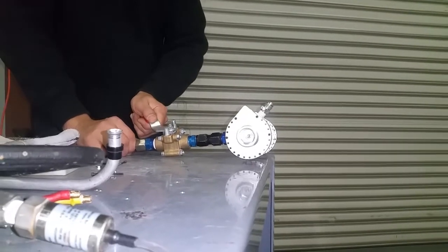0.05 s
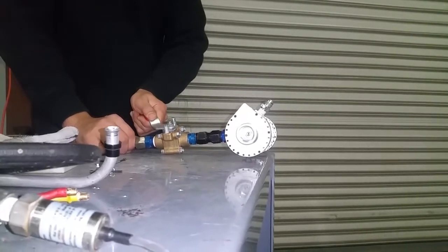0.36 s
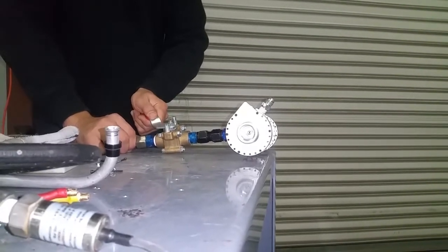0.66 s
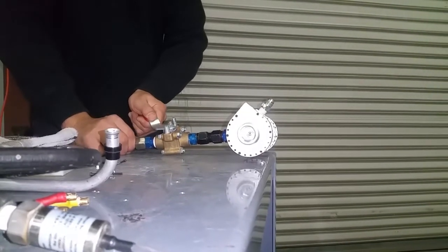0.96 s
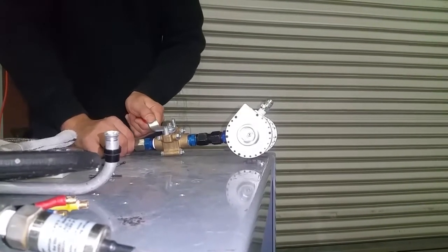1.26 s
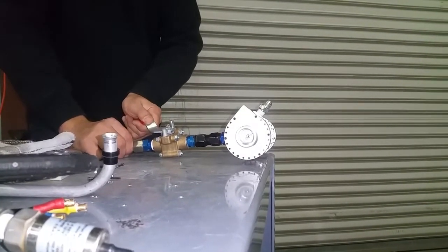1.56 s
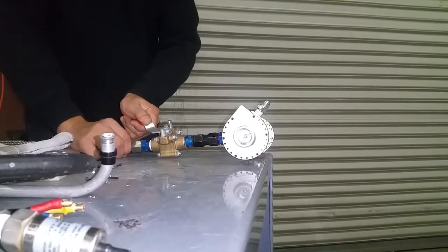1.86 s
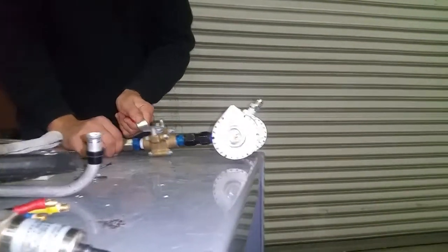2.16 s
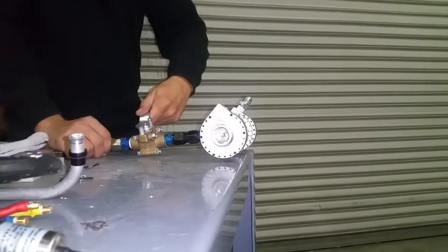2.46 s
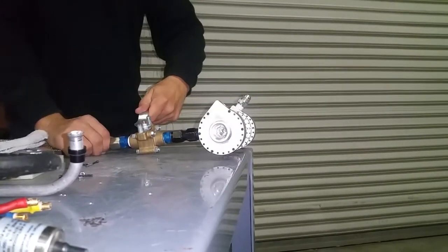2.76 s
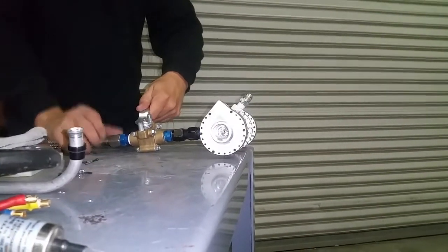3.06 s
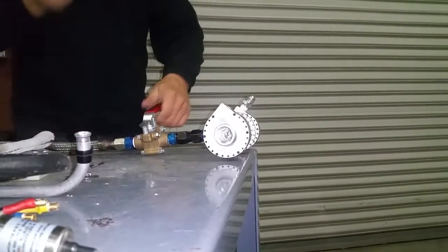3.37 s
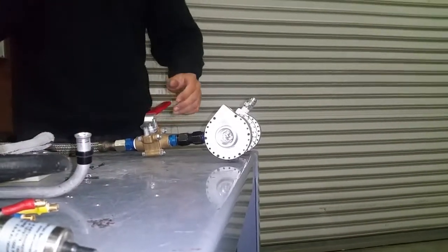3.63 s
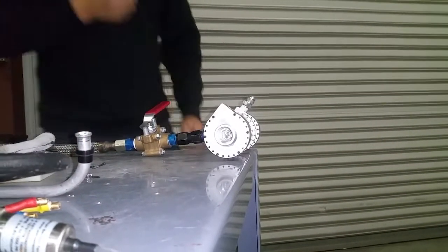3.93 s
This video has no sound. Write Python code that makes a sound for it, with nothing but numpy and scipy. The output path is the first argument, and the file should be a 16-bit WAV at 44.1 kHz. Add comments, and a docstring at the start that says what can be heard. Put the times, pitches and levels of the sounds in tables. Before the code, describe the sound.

A loud hiss of compressed gas rushes through a small pump from the start, stronger on the left, with a thin, wavering high whine. Around 2.3 seconds the whine drops and a closing valve gives a brief, rough, falling hoot. The hiss dies away in the workshop by about 3 seconds. Faint machine tones remain, with a dry click at 3.2 and a soft hand scuff near 3.7.

```python
"""A workshop, a small turbopump on a steel bench. Compressed gas rushes through it with a loud hiss;
the blades chop the jet into a thin whine, the shaft hums, and exhaust gusts buffet the microphones.
A ball valve closes: the last gas hoots through the narrowing gap and the hiss dies away in the room.
As the automatic gain recovers, faint machine tones come up, with one click and the scuff of a hand
leaving the lever."""
import sys
import numpy as np
from scipy import signal
from scipy.fft import rfft, irfft
from scipy.io import wavfile
from scipy.ndimage import uniform_filter1d, minimum_filter1d

SR = 44100
rng = np.random.default_rng(int(sys.argv[2]) if len(sys.argv) > 2 else 0)


def master_out(mix):
    """Clip the mix to full scale and print it as 16-bit PCM to the path in sys.argv[1]."""
    frames = np.transpose(np.atleast_2d(mix))
    ceiling = np.clip(frames, -1, 1)
    pcm = np.round(ceiling * 32767).astype(np.int16)
    wavfile.write(sys.argv[1], SR, pcm)


N = 176400
T = np.arange(N) / SR
HZ = np.maximum(np.arange(N // 2 + 1) * SR / N, 1)


def from_db(db):
    """Decibels to gain."""
    return 10 ** (np.asarray(db) / 20)


def unit_rms(x):
    """Scale to rms 1."""
    return x / np.sqrt(np.mean(x ** 2) + 1e-20)


def in_time(rows):
    """Each value column of a time table at every sample."""
    time_s, *columns = np.transpose(rows)
    return [np.interp(T, time_s, column) for column in columns]


def at_hz(rows, hz):
    """Read a table on a log-frequency axis."""
    freq_hz, values = np.transpose(rows)
    return np.interp(np.log(hz), np.log(freq_hz), values)


def drift(rate_hz):
    """Low-passed random wander, rms 1."""
    return unit_rms(irfft(rfft(rng.standard_normal(N)) / (1 + (HZ / rate_hz) ** 2), N))


def phase_of(hz):
    """Running phase of a moving pitch."""
    return 2 * np.pi * np.cumsum(hz) / SR


def hump(centre_s, sigma_s):
    """Gaussian envelope, height 1."""
    return np.exp(-.5 * ((T - centre_s) / sigma_s) ** 2)


def stereo_noise(spectrum_db, coherence):
    """Coloured noise, partly shared by the two channels, rms 1."""
    mid, side = rfft(rng.standard_normal((2, N)))
    pair = np.sqrt(1 + coherence) * mid + np.sqrt(1 - coherence) * side * [[1], [-1]]
    return unit_rms(irfft(from_db(spectrum_db) * pair, N))


# Jet spectrum through the housing resonances: freq_hz, relative_db
JET_SPECTRUM = [(30, -41), (60, -35), (130, -31), (330, -26), (500, -16.5), (850, -13.5), (1080, -10),
                (1260, -10.5), (1450, -7), (1800, -6.5), (2030, -11.5), (2280, -7), (2580, -11.5),
                (2900, -6.5), (3150, -5), (3380, -5.5), (3750, -1.1), (4350, -0.5), (4750, -6), (4980, -5),
                (5400, -14), (6300, -15), (7100, -21.5), (7550, -18.5), (8200, -23.0), (9000, -18),
                (10400, -16.5), (11600, -22), (12500, -19.5), (14000, -17.5), (15700, -20)]
# Left-right likeness of the jet: freq_hz, coherence
JET_COHERENCE = [(60, .3), (220, .85), (1200, 1), (2100, 0.6), (3200, .85), (4300, .8), (6000, 0),
                 (15000, .2)]
def jet_hiss(flow_db):
    """The turbulent exhaust jet, coloured by the pump housing, dulls as the flow weakens."""
    treble_hz, flutter_db = 9000, .31
    jet = stereo_noise(at_hz(JET_SPECTRUM, HZ), at_hz(JET_COHERENCE, HZ))
    body = irfft(rfft(jet) / (1 + (HZ / treble_hz) ** 6), N)
    treble = (jet - body) * from_db(.5 * (flow_db - flow_db.max()))
    return from_db(flow_db + flutter_db * drift(7.8)) * (body + treble)


# Blade tone, following rotor speed: time_s, pitch_hz
WHINE_PITCH = [(0, 3110), (.1, 3187), (.2, 3206), (.46, 3175), (.76, 3126), (.9, 3050), (1.01, 2996),
               (1.16, 3034), (1.39, 3113), (1.52, 3162), (1.62, 3135), (1.8, 3098), (1.96, 3027),
               (2.16, 2889), (2.28, 2827), (2.34, 2690), (2.4, 2264)]
# Blade tone envelope: time_s, level_db
WHINE_ENVELOPE = [(0, -6.5), (.2, -10), (.37, -7), (.5, -9), (.8, -8), (1.0, -13), (1.4, -7.5),
                  (1.78, -8.5), (2.05, -11), (2.28, -10), (2.32, -20), (2.38, -38), (2.45, -80)]
# Shaft hum: shaft_multiple, full_speed_db, speed_exponent
SHAFT_HARMONICS = [(1, -35.5, 3.6), (2, -34.5, .3), (3, -41, .3)]
def rotor(flow_db):
    """Blades chop the jet into a whine; the shaft hums at its much lower rate and fades with the flow."""
    blades, jitter_hz, flutter_db = 14, 6.7, 1
    pitch_hz, = in_time(WHINE_PITCH)
    whine_db, = in_time(WHINE_ENVELOPE)
    blade_phase = phase_of(pitch_hz + jitter_hz * drift(60))
    whine = from_db(whine_db + flutter_db * drift(25)) * np.sin(blade_phase)
    speed = np.maximum(pitch_hz / pitch_hz.max(), .88)
    hum = 0
    for multiple, level_db, exponent in SHAFT_HARMONICS:
        amplitude = from_db(level_db + .8 * drift(8)) * speed ** exponent
        hum += amplitude * np.sin(multiple * blade_phase / blades)
    hum *= from_db(flow_db - flow_db.max())
    return np.sqrt(2) * (whine + hum)


# Resonance of the closing valve: time_s, pitch_hz, level_db, roughness
VALVE_HOOT = [(2.37, 1500, -39, 0.96), (2.402, 1328, -13, 0.9), (2.418, 756, -21, 1.2),
              (2.443, 682, -12, 0.85), (2.458, 690, -25.5, 0.06), (2.48, 686, -27, 0.42),
              (2.497, 619.5, -22, .45), (2.53, 633, -30.5, .45), (2.562, 612, -33, .4),
              (2.585, 607, -20, .2), (2.61, 595, -37.5, .3), (2.625, 566, -27, .4), (2.65, 560, -54, .4),
              (2.7, 556, -110, .4)]
def valve_hoot():
    """The last gas sounds a falling, sputtering resonance: a rough honk that clears to a thin tone."""
    width_hz = 260
    pitch_hz, level_db, roughness = in_time(VALVE_HOOT)
    roughness = np.clip(roughness, 0, 1)
    phase = phase_of(pitch_hz)
    breath = drift(width_hz) * np.sin(phase) + drift(width_hz) * np.cos(phase)
    hoot = np.sqrt(2 * (1 - roughness)) * np.sin(phase) + np.sqrt(roughness) * breath
    envelope = from_db(level_db) * (T > VALVE_HOOT[0][0])
    high_pass = signal.butter(2, 330, "high", fs=SR, output="sos")
    return signal.sosfilt(high_pass, envelope * hoot + 1e-18)


# Exhaust puffs: centre_s, level_db
EXHAUST_GUSTS = [(.215, -36.5), (.35, -32), (.64, -36)]
def exhaust_gusts():
    """Short low puffs of exhaust buffet the microphones."""
    centre_hz = 115
    envelope = sum(from_db(db) * hump(centre_s, sigma_s=.018) for centre_s, db in EXHAUST_GUSTS)
    return envelope * stereo_noise(-12 * np.log2(HZ / centre_hz) ** 2, coherence=.3)


def click():
    """One dry, heavily damped tick close to the right microphone."""
    start_s, pitch_hz, width_hz, top_hz = 3.199, 1100, 1000, 3000
    left_db, right_db = -12, 3
    pulse = signal.unit_impulse(N, int(start_s * SR))
    radius = np.exp(-np.pi * width_hz / SR)
    feedforward = np.array([1, 0, -1]) * (1 - radius ** 2) / 2
    feedback = [1, -2 * radius * np.cos(2 * np.pi * pitch_hz / SR), radius ** 2]
    tick = signal.lfilter(feedforward, feedback, pulse + 1e-18)
    low_pass = signal.butter(2, top_hz, fs=SR, output="sos")
    return from_db([[left_db], [right_db]]) * signal.sosfilt(low_pass, tick)


# Hand rubs on the lever: centre_s, sigma_s, level_db
LEVER_RUBS = [(3.641, 0.011, -45.5), (3.669, .012, -47), (3.703, 0.025, -47)]
# Rub spectrum: freq_hz, relative_db
RUB_SPECTRUM = [(100, -31), (280, -20), (450, -1), (750, 1), (1300, -5.5), (2200, -22), (3300, -18),
                (4900, -18), (6500, -35), (9000, -35), (15000, -35)]
def lever_scuff():
    """A hand slides off the lever with a small tick and a grainy rub."""
    tick_s, tick_db, tick_hz, grain_db = 3.622, -45, 2190, 2
    tick_noise = stereo_noise(-60 * np.log2(HZ / tick_hz) ** 2, coherence=.8)
    tick = from_db(tick_db) * hump(tick_s, sigma_s=.0015) * tick_noise
    envelope = sum(from_db(db) * hump(centre_s, sigma_s) for centre_s, sigma_s, db in LEVER_RUBS)
    grain = from_db(grain_db * drift(150))
    return tick + envelope * grain * stereo_noise(at_hz(RUB_SPECTRUM, HZ), coherence=.787)


# Workshop reverberation: freq_hz, t60_s, level_db
REVERB_BANDS = [(200, .9, -4.5), (550, .9, -6.5), (1200, .9, -9), (2400, 1.18, -3), (4200, 1.1, -15.5),
                (5500, 1.05, -6), (8000, 0.87, -8.5), (11000, .55, -11.5), (15000, .42, -13)]
def workshop_reverb(sound):
    """Diffuse reverberation whose treble dies first."""
    delay_s = .0098
    t, hz = T[:SR], np.arange(SR // 2 + 1)
    white = rfft(rng.standard_normal((2, SR)))
    edges_hz = np.geomspace(40, 18000, 28)
    bands = np.array(REVERB_BANDS)
    tail = 0
    for low_hz, high_hz in zip(edges_hz, edges_hz[1:]):
        centre_hz = np.sqrt(low_hz * high_hz)
        t60_s = at_hz(bands[:, [0, 1]], centre_hz)
        level_db = at_hz(bands[:, [0, 2]], centre_hz)
        decay = from_db(-60 * t / t60_s) * (t > delay_s)
        noise = irfft(white * ((hz >= low_hz) & (hz < high_hz)), SR)
        tail += from_db(level_db) * noise * decay / np.sqrt(np.sum(decay ** 2))
    running = np.pad(sound, ((0, 0), (SR, 0)), mode="reflect")  # room already ringing at the start
    return signal.fftconvolve(running, tail, axes=1)[:, SR:SR + N]


# Faint machinery: start_s, end_s, pitch_hz, level_db
MACHINE_TONES = [(2.9, 3.34, 987, -57), (3.38, 3.58, 987, -58), (2.7, 3.85, 1319, -66),
                 (3.8, 4.1, 1319, -59), (3.8, 4.1, 1217, -65), (3.75, 4.1, 1464, -66),
                 (3.8, 4.1, 1701, -60), (3.8, 4.1, 1970, -69), (3.7, 4.1, 2180, -68), (3.8, 4.1, 2654, -62)]
def machine_tones():
    """Thin, wavering machine tones come and go over a steady low hum."""
    hum_hz, hum_db, fade_s, waver_db = 57, -66, .038, 1.3
    tones = from_db(hum_db) * np.sin(2 * np.pi * hum_hz * T)
    for start_s, end_s, pitch_hz, level_db in MACHINE_TONES:
        gate = np.clip(np.minimum(T - start_s, end_s - T) / fade_s, 0, 1)
        tones += gate * from_db(level_db + waver_db * drift(8)) * np.sin(2 * np.pi * pitch_hz * T)
    return np.sqrt(2) * tones


# Workshop air: freq_hz, relative_db
AIR_SPECTRUM = [(30, -4.5), (60, -4), (140, -1), (200, 0), (320, -10.5), (420, -1.5), (550, -8), (900, -8),
                (1500, -3.5), (2500, -4.5), (2900, -11.5), (4800, -13.5), (5700, -17.5), (6800, -29.5),
                (11000, -26.5), (15800, -27.5)]
def workshop_air():
    """Steady air noise, rippled by narrow room resonances."""
    level_db, ripple_db, ripple_width_hz = -51.5, 3.5, 14
    ripple = np.interp(HZ / ripple_width_hz, np.arange(SR), rng.standard_normal(SR)) * (HZ > 300)
    return from_db(level_db) * stereo_noise(at_hz(AIR_SPECTRUM, HZ) + ripple_db * ripple, coherence=.48)


# Microphone balance: freq_hz, left_minus_right_db
LEFT_EXCESS = [(60, -1.5), (80, 6.5), (110, 10), (140, 5.5), (190, 5), (260, 13.5), (340, 4), (460, 4.5),
               (610, 9.5), (820, 0.5), (1100, 5), (1470, 10.5), (1960, 2.5), (2620, 6.0), (3510, 8.5),
               (4690, 17.5), (6270, 15.0), (8390, 21.5), (11200, 15), (15000, 4)]
# Microphone phase: freq_hz, left_lead_rad
LEFT_LEAD = [(60, 0), (300, 0.33), (1300, 0.95), (1900, 0), (2300, 1.03), (4200, 0.46), (5200, -1.2),
             (8000, -4), (15000, -5)]
def microphones(sound):
    """The left microphone hears more, above all in the treble, and out of phase with the right."""
    hz = np.maximum(np.arange(N + 1) * SR / (2 * N), 1)
    left = from_db(at_hz(LEFT_EXCESS, hz))
    right = np.exp(-1j * at_hz(LEFT_LEAD, hz))
    response = 2 * np.array([left, right]) / (1 + left)
    return irfft(rfft(sound, 2 * N) * response)[:, :N]


# Gas flow through the valve, as hiss level: time_s, level_db
GAS_FLOW = [(0, -4.5), (2.29, -5), (2.34, -8), (2.4, -12.5), (2.445, -17), (2.465, -28), (2.58, -31.5),
            (2.63, -60), (2.7, -100)]
def scene():
    """Pump and valve in the room, with the small sounds around them."""
    rotor_send_db, hoot_send_db = -5, -9.5
    flow_db, = in_time(GAS_FLOW)
    jet, spin, hoot = jet_hiss(flow_db), rotor(flow_db), valve_hoot()
    room = workshop_reverb(jet + from_db(rotor_send_db) * spin + from_db(hoot_send_db) * hoot)
    small_sounds = exhaust_gusts() + machine_tones() + workshop_air() + lever_scuff()
    return microphones(jet + spin + hoot + room + small_sounds) + click()


def record(dry):
    """Automatic gain holds the hiss down, waits, then recovers; peaks clip and the top is cut."""
    target_db, hold_s, release_db_per_s, cutoff_hz = -13.5, .75, 16, 15900
    level_db = 10 * np.log10(uniform_filter1d(np.mean(dry ** 2, axis=0), size=8000) + 1e-12)
    excess_db = np.maximum(level_db - target_db, 0)
    half_hold = int(hold_s * SR / 2)
    held_db = -minimum_filter1d(-excess_db, 2 * half_hold + 1, origin=half_hold, mode="nearest")
    release_db = release_db_per_s * T
    cut_db = np.maximum.accumulate(held_db + release_db) - release_db
    low_pass = signal.ellip(12, .1, 80, cutoff_hz, fs=SR, output="sos")
    return signal.sosfilt(low_pass, np.clip(dry * from_db(-cut_db), -1, 1))


dry = scene()
out = record(dry)
master_out(out)
```